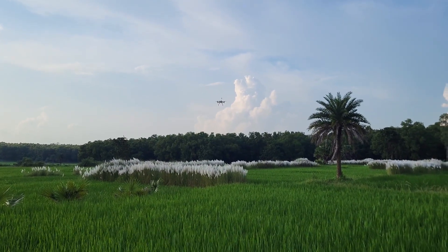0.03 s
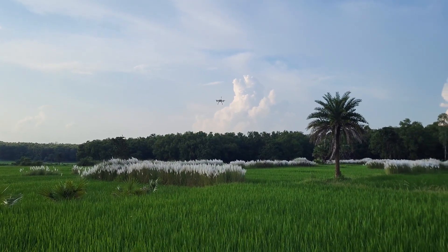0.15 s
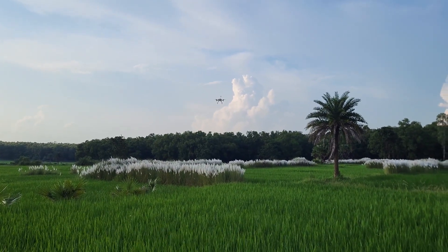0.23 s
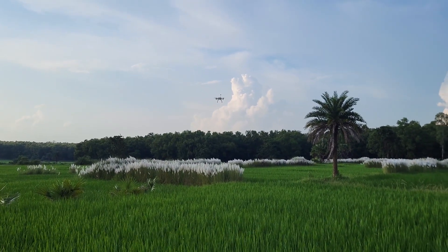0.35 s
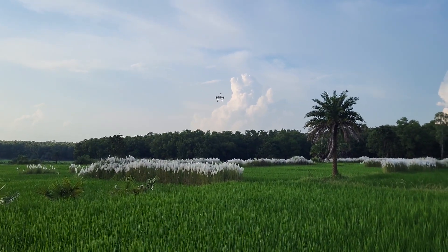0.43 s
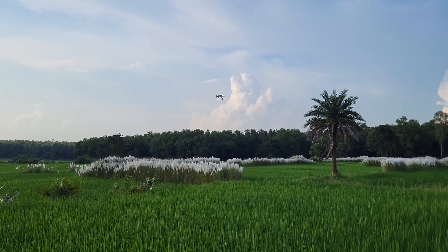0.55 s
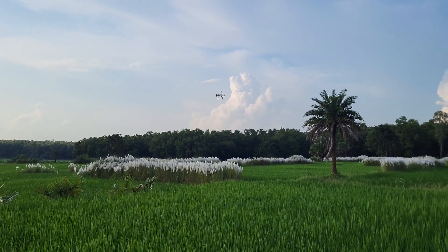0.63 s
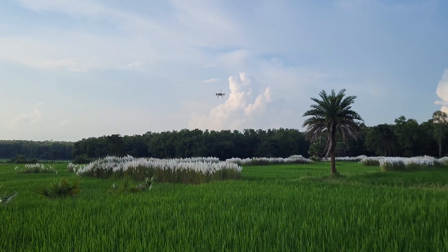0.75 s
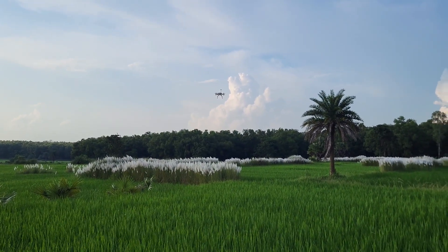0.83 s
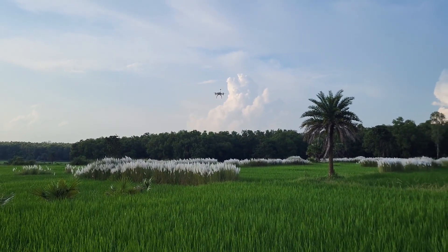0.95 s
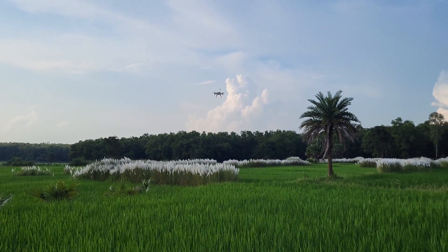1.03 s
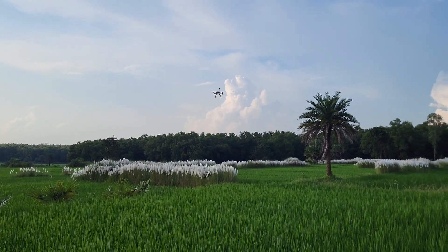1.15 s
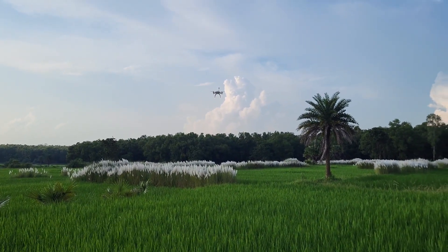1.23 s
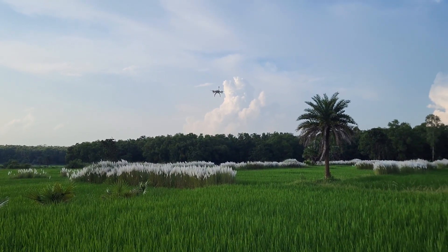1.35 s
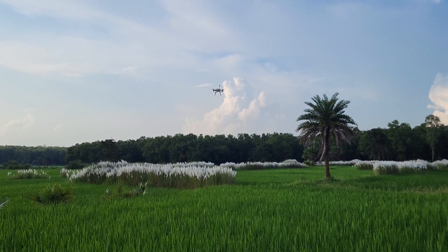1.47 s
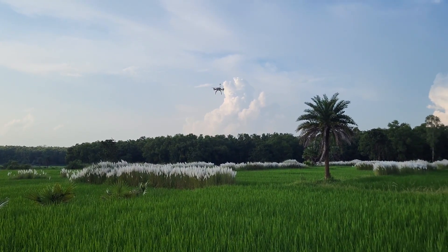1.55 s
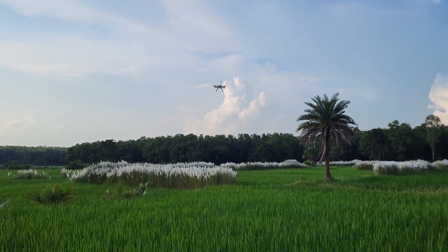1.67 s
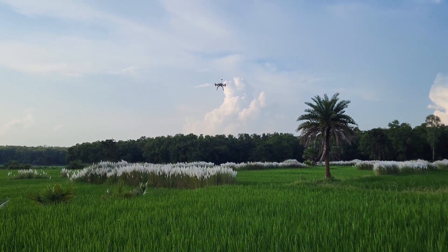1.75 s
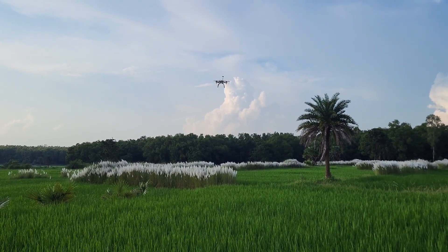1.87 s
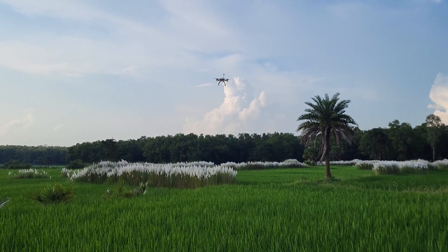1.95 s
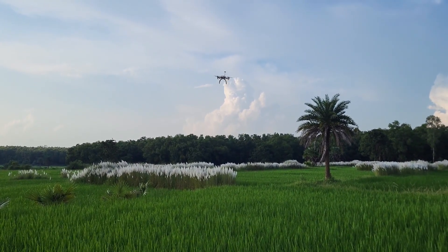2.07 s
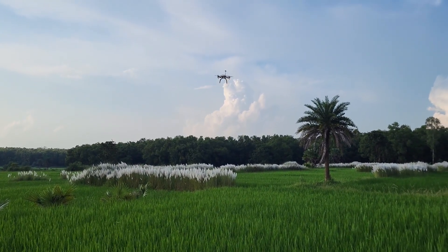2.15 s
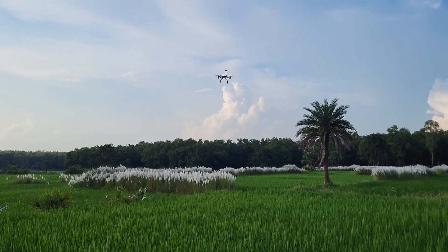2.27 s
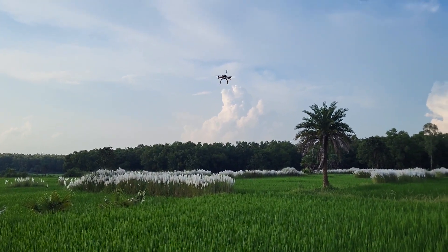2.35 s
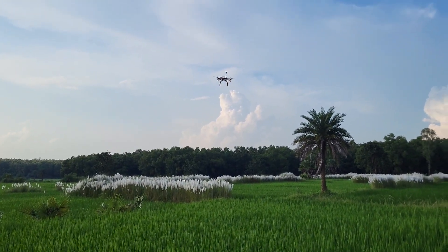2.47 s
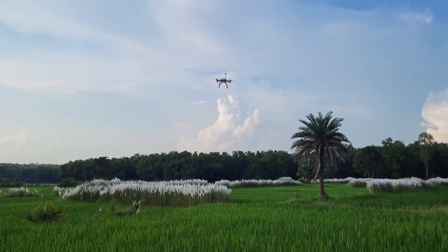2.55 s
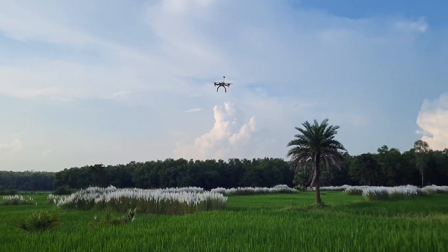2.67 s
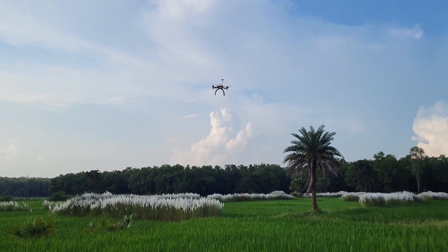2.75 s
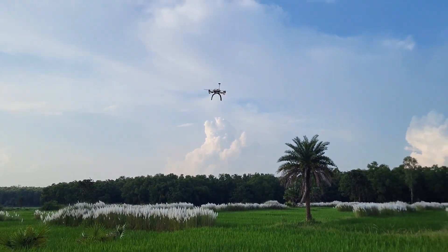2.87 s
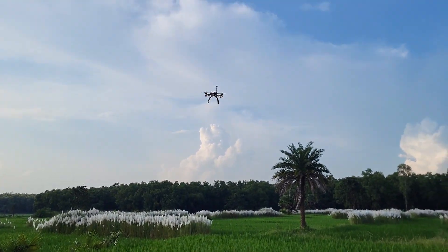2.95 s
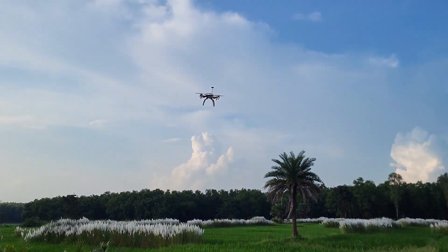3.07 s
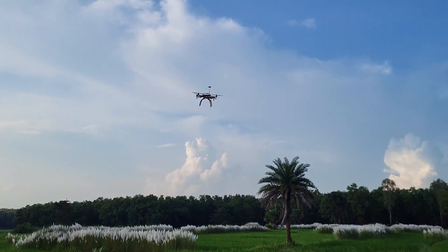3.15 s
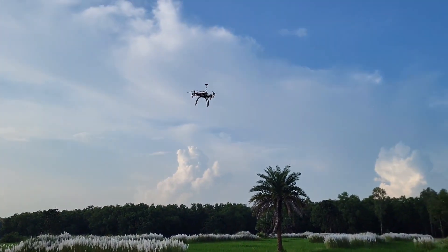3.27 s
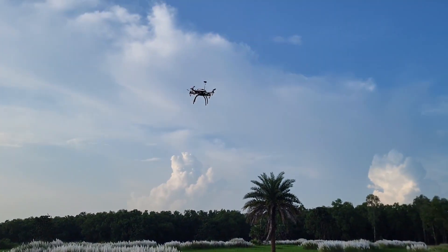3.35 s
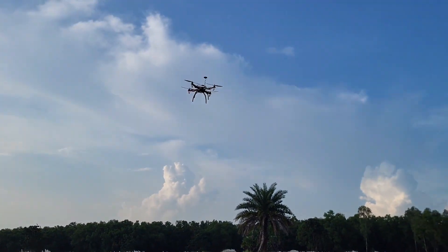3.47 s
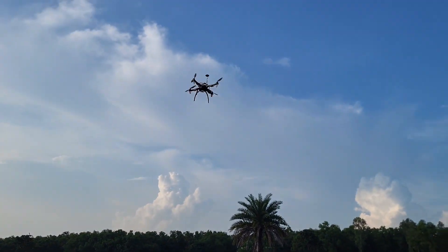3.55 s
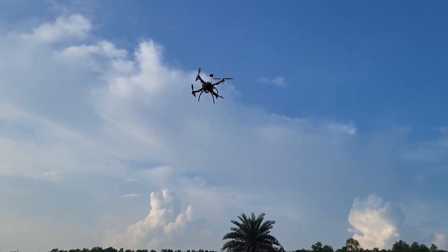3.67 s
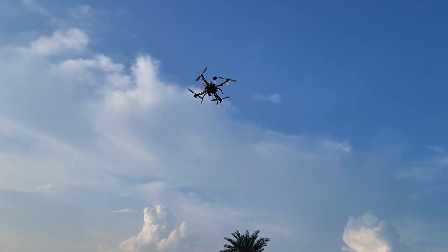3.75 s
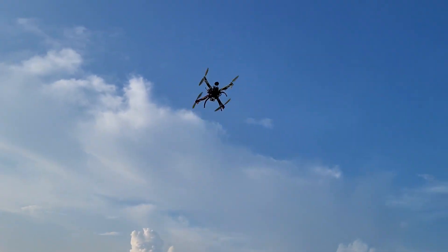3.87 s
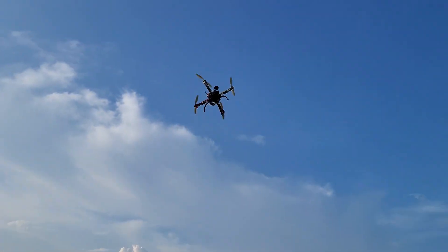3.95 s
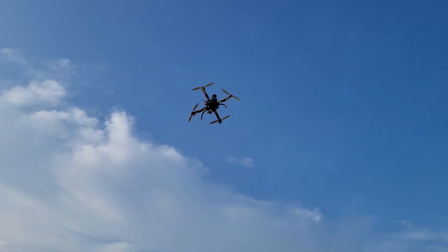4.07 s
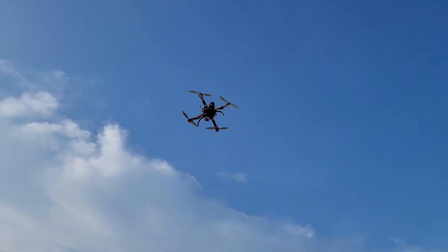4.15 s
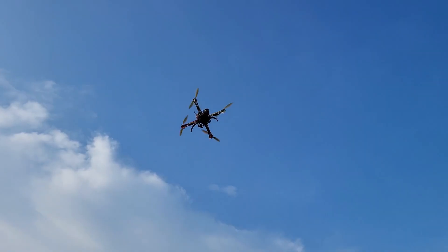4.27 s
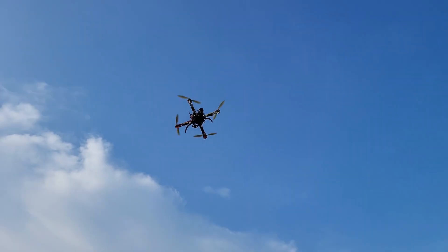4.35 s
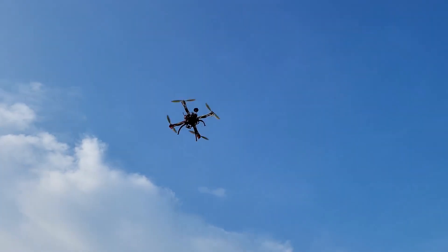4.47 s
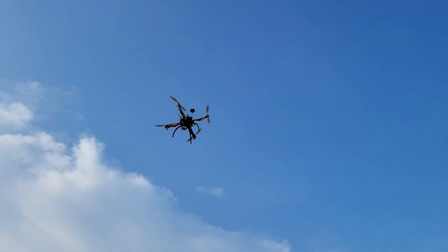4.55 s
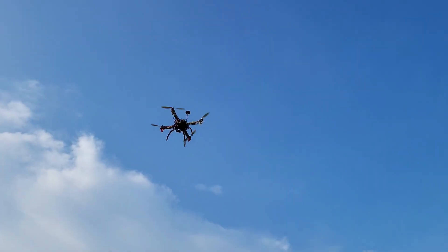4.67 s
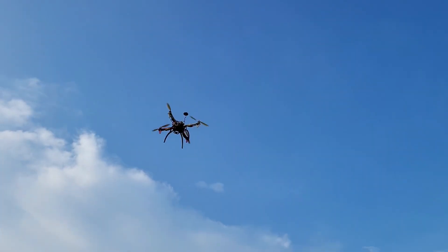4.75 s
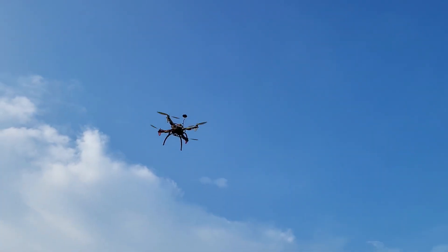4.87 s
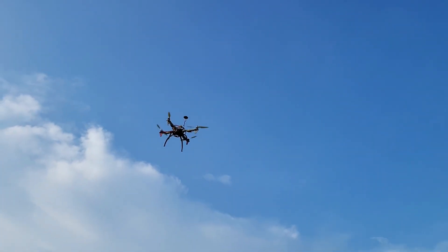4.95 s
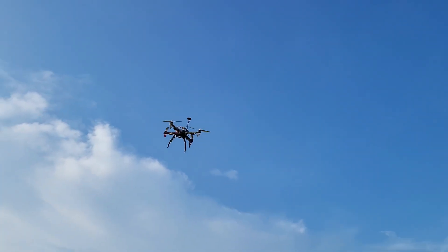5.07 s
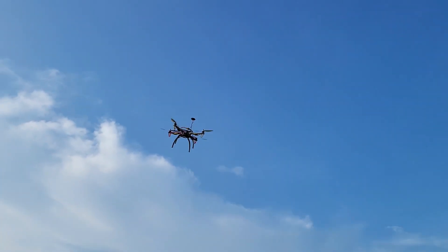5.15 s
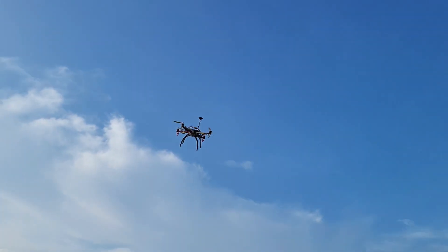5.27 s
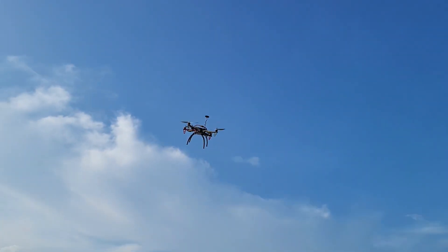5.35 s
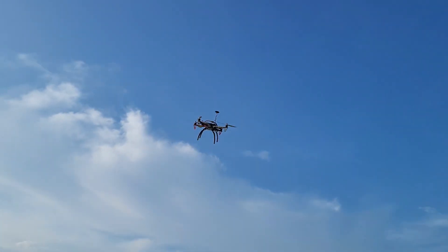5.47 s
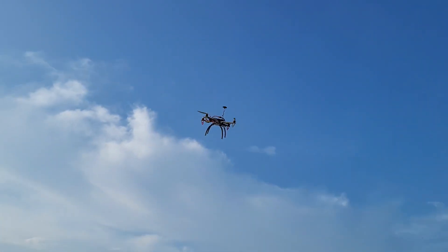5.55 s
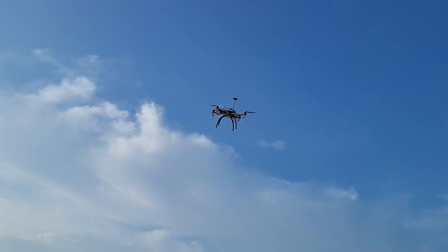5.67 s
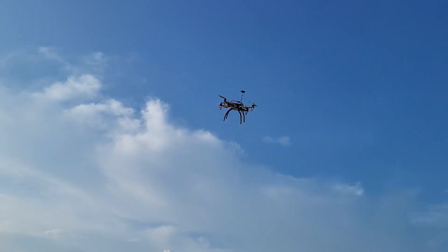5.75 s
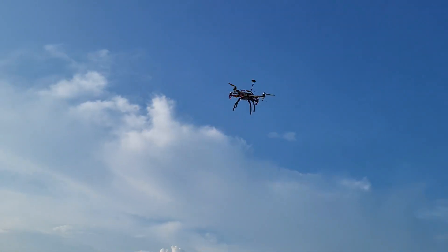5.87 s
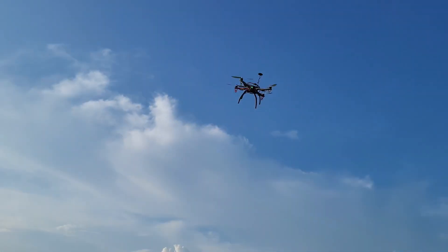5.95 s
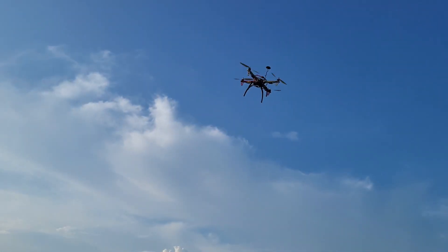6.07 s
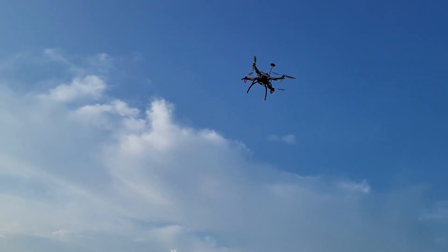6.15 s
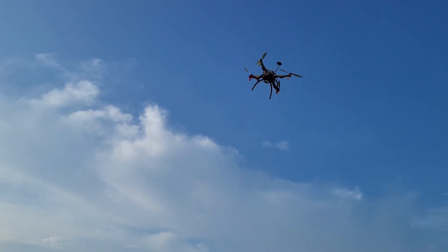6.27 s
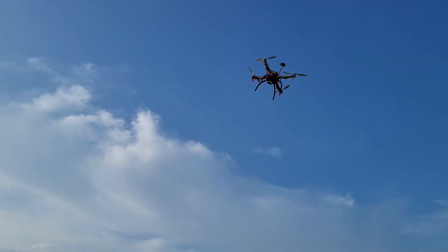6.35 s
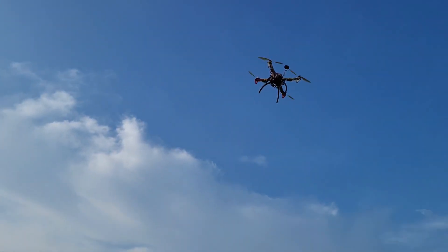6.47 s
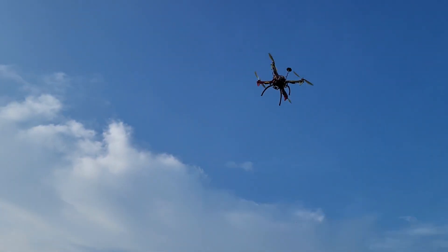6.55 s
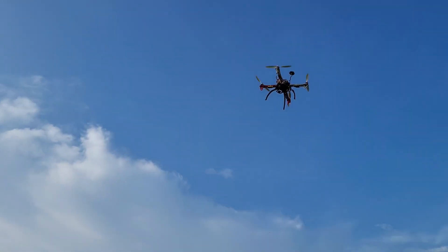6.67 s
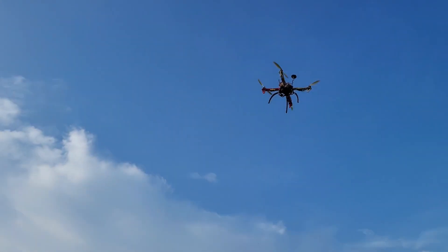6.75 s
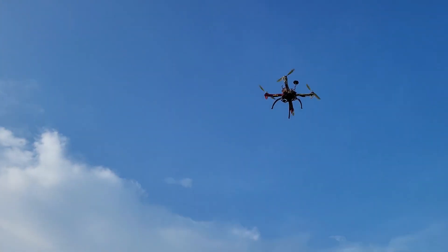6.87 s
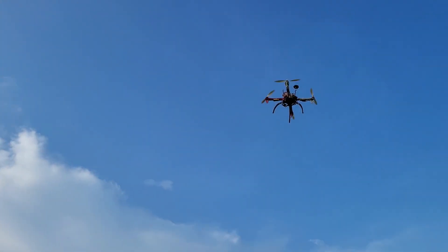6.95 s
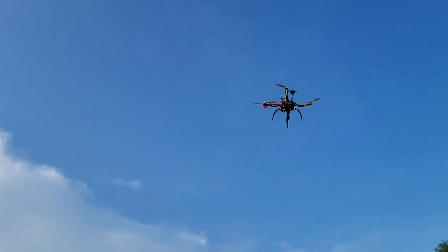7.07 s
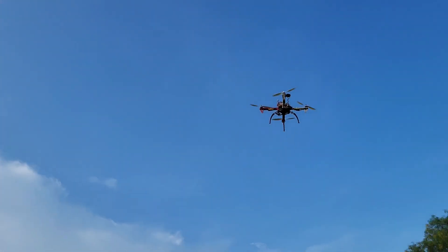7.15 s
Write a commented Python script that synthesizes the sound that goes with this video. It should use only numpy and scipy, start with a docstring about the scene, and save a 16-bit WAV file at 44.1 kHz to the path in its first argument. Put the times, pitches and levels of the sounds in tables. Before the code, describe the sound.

Four slightly mismatched rotors buzz from a distance, their pitches wobbling and beating together, with piercing motor whines above. The drone comes near and its torn-air noise surges as it passes above the listener, then drops back and swells once more. A handheld outdoor stereo microphone picks up low wind thumps and flutter, over a very faint field background.

```python
"""Four propellers of a low quadcopter hum at slightly different speeds and whip up a rushing noise
as it flies in over a rice field, passes overhead near 4 s and hovers close by.
Its motors whine at multiples of shaft speed; their coils sing near 8 kHz with a Doppler bend.
Puffs of wind bump the microphone ports as swings of pressure with flutter; the field is faint noise."""
import sys
import numpy as np
from scipy import signal
from scipy.fft import rfft, irfft, next_fast_len
from scipy.io import wavfile
from scipy.ndimage import uniform_filter1d, map_coordinates

SR = 44100
rng = np.random.default_rng(int(sys.argv[2]) if len(sys.argv) > 2 else 0)


def unload_wav(signal):
    """Save mono or channel-first audio to the path in sys.argv[1] as 16-bit WAV at rate SR, clipped to [-1, 1]."""
    wavfile.write(
        sys.argv[1],
        SR,
        np.round(np.clip(np.atleast_2d(signal).T, -1, 1) * 32767).astype(np.int16),
    )


N = 318402
START_M, CLOSEST_M = 14, 3  # distance at the start, least distance

# Flight towards the microphone. Each row: time in seconds, closing speed in m/s.
CLOSING_SPEED = [(0, 1.6), (2.7, 3.5), (3.5, 3.6), (3.75, 2.5), (4.1, .1), (4.6, -1.6), (5.1, -2.1),
                 (6.1, .15), (6.7, -.7), (7.22, -2)]
# Side of the drone that is heard. Each row: time in seconds, side (0 ahead, 1 below, 2 beside).
HEARD_SIDE = [(0, 0), (3.4, 0), (3.75, 1), (4.5, 1), (5.1, 2), (7.22, 2)]
# Air torn by the blades, loudest from below. Each row: time in seconds, level in dB.
BLADE_WASH = [(0, -57.5), (1.7, -53), (2.6, -50), (3.0, -47), (3.56, -43), (3.66, -34), (3.76, -29.5),
              (3.86, -27), (4.2, -26.5), (4.46, -28.5), (4.7, -36), (4.93, -39), (5.08, -41.5), (5.4, -45),
              (5.95, -43.5), (6.18, -37), (6.55, -32.5), (7.22, -35.5)]
# Relative strength of the rotors. Each row, one a rotor: level in dB ahead, below, beside.
ROTOR_LEVELS = [(-3, 1.5, -3), (2.5, -1.5, 1.5), (-4.5, -8, -0.5), (-6, -4.5, -1.5)]


def amp(db):
    """Decibels to gain."""
    return 10 ** (np.asarray(db) / 20)


def unit(x):
    """Scale to rms 1."""
    return x / np.sqrt(np.mean(x ** 2) + 1e-20)


def along(points, hz):
    """(Hz, value) points joined on a log axis."""
    f, v = np.transpose(points)
    return np.interp(np.log(hz + 1), np.log(f + 1), v)


def curves(rows):
    """One value per sample for each column after the time."""
    s, *cols = np.transpose(rows)
    return np.array([np.interp(np.arange(N) / SR, s, c) for c in cols])


def wobble(rate_hz):
    """A smooth random curve, rate_hz knots a second, computed every 32 samples."""
    knots = rng.standard_normal(int(N * rate_hz / SR) + 4)
    coarse = np.arange(0, N + 32, 32)
    return np.interp(np.arange(N), coarse, map_coordinates(knots, [coarse * rate_hz / SR]))


def angle(hz):
    """Running phase of a changing frequency."""
    return 2 * np.pi * np.cumsum(hz) / SR


def filtered(x, response):
    """x times a response of frequency."""
    m = next_fast_len(N + SR // 4)
    return irfft(rfft(x, m) * response(np.fft.rfftfreq(m, 1 / SR)), m)[..., :N]


def noise(spectrum, alike):
    """Stereo noise of rms 1 with a given colour in dB and left-right correlation."""
    def mid_side(hz):
        turn = np.arccos(np.clip(along(alike, hz), -1, 1)) / 2
        return amp(along(spectrum, hz)) * [np.cos(turn), np.sin(turn)]

    mid, side = filtered(rng.standard_normal((2, N)), mid_side)
    return unit(np.array([mid + side, mid - side]))


def swells(rows):
    """Gain of smooth rises and dips; each row: centre in s, half length in s, dB."""
    t = np.arange(N) / SR
    return amp(sum(db * np.exp(-np.minimum(((t - s) / half_s) ** 2, 20)) for s, half_s, db in rows))


def distance():
    """Metres to the drone, from its closing speed."""
    return np.maximum(START_M - np.cumsum(curves(CLOSING_SPEED)[0]) / SR, CLOSEST_M)


def by_side(levels_db):
    """Gain for the side of the drone that is heard, from its levels ahead, below and beside."""
    power = amp(levels_db) ** 2
    return np.sqrt(np.interp(curves(HEARD_SIDE)[0], np.arange(len(levels_db)), power))


def swell_db():
    """How far the blade wash is below its peak overhead."""
    db = curves(BLADE_WASH)[0]
    return db - db.max()


def shaft_angles(trim=.0026, trim_hz=18, flutter=.0018, flutter_hz=60):
    """Running angle of each motor, which jitters a little around its speed."""
    # Speeds as heard, trimmed by the flight controller; one list a motor.
    # Each row: time in seconds, shaft speed in Hz before jitter.
    shaft_speeds = [
        [(0, 76.6), (.55, 76), (.68, 76.8), (.82, 80.2), (.97, 79.2), (1.07, 79.7), (1.18, 78.7), (1.27, 78.06),
         (1.42, 80.1), (1.54, 81.2), (1.68, 78.8), (1.8, 79.3), (1.97, 80.5), (2.1, 78.9), (2.22, 79.93),
         (2.53, 78.96), (2.77, 80.8), (2.9, 79.65), (3, 81.86), (3.07, 82.17), (3.16, 84.14), (3.3, 84.4),
         (3.42, 79.6), (3.52, 79.34), (3.7, 84.95), (3.85, 82.48), (4, 77.58), (4.12, 74.94), (4.25, 76.3),
         (4.45, 71.66), (4.7, 76.78), (4.95, 75.32), (5.2, 76.53), (5.38, 78.7), (5.53, 80.9), (5.64, 79.26),
         (5.73, 80.3), (5.8, 80.2), (5.88, 81.6), (6.04, 77.73), (6.27, 80.08), (6.45, 78.72), (6.7, 76.84),
         (7.22, 75.52)],
        [(0, 77.7), (.3, 78.5), (.5, 77), (.65, 76.8), (.8, 79.05), (1, 77.1), (1.27, 78.55), (1.45, 77.4),
         (1.62, 78.65), (1.85, 77.53), (2.37, 78.3), (2.5, 77.6), (2.7, 79.8), (2.93, 80.96), (3.05, 79.7),
         (3.17, 80.09), (3.45, 77.53), (3.78, 80.86), (4.1, 74.96), (4.45, 71.98), (4.8, 73.7), (5.12, 74.3),
         (5.25, 76.52), (5.45, 78.73), (5.78, 79.32), (5.95, 76.1), (6.12, 78.65), (6.6, 77.42), (7.22, 76.3)],
        [(0, 74.5), (.3, 73.1), (.7, 71.4), (.95, 72.4), (1.07, 73.4), (1.2, 72.4), (1.45, 72), (1.7, 72.63),
         (2.55, 72.73), (2.75, 74.5), (2.87, 73.2), (3.08, 75.2), (3.3, 71.97), (3.52, 71.98), (3.8, 60.58),
         (4.05, 66.35), (4.5, 71.9), (5.1, 74.14), (5.22, 75.3), (5.42, 76.6), (5.78, 75.43), (5.9, 76.73),
         (6.05, 75.14), (6.22, 74.03), (6.35, 72.96), (6.6, 74.54), (7.22, 73.96)],
        [(0, 84.8), (.42, 83.1), (.57, 84.6), (.8, 83.7), (1.35, 84.26), (1.5, 84.3), (1.63, 83.25),
         (1.8, 84.4), (1.97, 83.5), (2.12, 85.46), (2.35, 83.4), (2.5, 85.5), (2.7, 82.4), (2.87, 83.1),
         (3.05, 81.98), (3.3, 83.72), (3.62, 87.5), (3.9, 87.06), (4.1, 82.08), (4.35, 84.08), (4.6, 82.05),
         (4.85, 76.6), (5.1, 75.94), (5.3, 77.8), (5.48, 80.9), (5.6, 79.9), (5.75, 80.87), (5.95, 79.08),
         (6.12, 77.27), (6.35, 77.9), (7.22, 75.1)],
    ]
    shafts = []
    for speed in shaft_speeds:
        jitter = 1 + trim * wobble(trim_hz) + flutter * wobble(flutter_hz)
        shafts.append(angle(curves(speed)[0] * jitter))
    return shafts


def propellers(shafts, waver_db=3.3, rough_rad=0.16, grazing_m=10.07, grazing_power=3.5):
    """Two-blade rotors beat together; ground reflection cancels bass of the far, low drone."""
    # Blade-pass harmonics at full strength. Each row: level in dB ahead, below, beside,
    # dB cancelled by the ground at grazing_m.
    harmonics = [(-25, -33.5, -29, 16.5), (-31, -31, -40, 0.5), (-29, -29, -27, 3.5),
                 (-36.5, -34, -39, 3.5), (-42, -38, -56, 1), (-45, -47, -51.5, 3), (-36, -43, -39, 4.5),
                 (-46, -43, -60, 4)]
    # Hum swells and dips. Each row: centre in seconds, half length in seconds,
    # change in dB of the first, second and third harmonic.
    hum_swells = [(.15, .2, -6, -2, 1.5), (0.66, 0.11, -8, -17, -8), (0.877, .05, 0, 5, -2),
                  (1.04, 0.031, -3, 8, -13), (1.24, .07, -3, 4, -2), (1.52, .06, 5, 2, 3),
                  (2.101, 0.086, 7, 1, 5.5), (2.4, 0.058, 3, -8, 3), (2.76, 0.16, -0.5, -15, -10),
                  (3.04, 0.038, 3, 4, 5), (3.25, 0.12, 2, 4.5, 1.5), (3.58, 0.072, -8, -6, -6),
                  (3.789, 0.052, 7, 5.5, 1.5), (3.93, 0.031, -4, -7, -1.5), (4.005, 0.038, 8, 7, 4),
                  (4.109, 0.034, 6, 11, 8.5), (4.27, 0.1, 3, -3.5, -0.5), (4.48, 0.082, -5, 2, 1.5),
                  (4.75, .17, 0, -4, -1.5), (5.19, 0.049, 5, 0, 7), (5.38, .03, -2, -2, -10),
                  (5.521, 0.11, 0.5, 6, 4), (5.869, 0.079, 7, 7, 6.5), (6.27, 0.084, 4, 7, 6),
                  (6.72, .12, -3, -2, -3.5), (7.08, 0.14, -5, -4, 0)]

    lifts = [swells([(s, half_s, dbs[k]) for s, half_s, *dbs in hum_swells]) for k in range(3)]
    lifts.append(np.sqrt(lifts[2]))  # higher harmonics follow the third half as far in dB
    swell = swell_db()
    grazing = (distance() / grazing_m) ** grazing_power  # ground's share grows steeply with distance
    levels = []
    for k, (*sides, ground_db) in enumerate(harmonics):
        levels.append(by_side(sides) * amp(swell - ground_db * grazing) * lifts[min(k, 3)])

    shares = np.array([by_side(sides) for sides in ROTOR_LEVELS])
    shares /= np.linalg.norm(shares, axis=0)
    out = np.zeros(N)
    for shaft, share in zip(shafts, shares):
        blade = 2 * shaft + rough_rad * wobble(60)
        for k, level in enumerate(levels, 1):
            tone = np.sin(k * blade + rng.uniform(0, 2 * np.pi))
            out += share * level * unit(amp(waver_db * wobble(20)) * tone)
    return out


def turbulence(shafts, order=128, odd_db=-7):
    """Each blade sheds nearly the same eddies turn after turn; the pattern slowly changes."""
    k = np.arange(order)
    weights = amp(odd_db * (k % 2)) * (k > 6) / np.sqrt(1 + (k / 40) ** 4)
    grid = np.linspace(0, 2 * np.pi, 2048, endpoint=False)
    out = np.zeros(N)
    for shaft, (ahead_db, *_) in zip(shafts, ROTOR_LEVELS):
        patterns = irfft(weights * np.exp(2j * np.pi * rng.random((3, order))), len(grid))
        blend = np.array([wobble(14) for _ in patterns])
        blend /= np.linalg.norm(blend, axis=0) + 1e-6  # the shape changes, the power stays
        turn = shaft % (2 * np.pi)
        out += amp(ahead_db / 2) * sum(b * np.interp(turn, grid, p) for b, p in zip(blend, patterns))
    # equal in spectral density to unit white noise at the low harmonics
    return unit(out) * np.sqrt(2 * 3200 / SR)


def patchy(x, depth_db=1.35):
    """Eddies make patches of the noise, in time and frequency, louder and softer."""
    z = signal.stft(x, nperseg=512)[2]
    patches = rng.standard_normal(z.shape[1:])
    patches = uniform_filter1d(patches, size=5, axis=0)
    patches = uniform_filter1d(patches, size=14, axis=1)
    return signal.istft(z * amp(depth_db * unit(patches)), nperseg=512)[1][:, :N]


def rush(shafts, pulsing=0.12, swirl_db=1.1, hiss_growth=0.79):
    """Turbulence off the blades, part buzz and part noise, coloured by the side that is heard."""
    # Colour of the air from three sides. Each row: frequency in Hz, relative density in dB per Hz.
    ahead = [(150, -7), (350, 4.5), (600, 7), (820, -0.5), (1100, 7.5), (1350, 4.5), (1900, 9.5),
             (2350, 3.5), (2750, -1.5), (3300, 1), (3700, -1.5), (4100, 5), (4700, 3), (5200, -4.5),
             (7900, -0.5), (9500, -7.5), (11000, -6), (12000, -10.5), (17000, -6.5)]
    below = [(100, -26), (200, -2.5), (400, -1.5), (700, -6.5), (1150, -2), (1500, -7.5), (2080, -2.5),
             (2350, -6.5), (2800, -6.5), (4700, -3), (5400, -7.5), (8000, -10), (9000, -15.5), (10800, -19),
             (12200, -16.5), (17000, -16.5)]
    beside = [(150, -11), (450, 5.5), (680, -4), (850, -5), (1100, -0.5), (1650, -1.5), (2030, 2),
              (2350, -2.5), (2750, 3.5), (3800, 1.5), (4250, 4), (4900, -0.5), (8200, 1), (9000, -4),
              (9800, -9), (12000, -5.5), (17000, -7)]
    # Far and near drone. Each row: frequency in Hz, left-right correlation.
    far_alike = [(300, 0.63), (1400, 0.92), (3100, 0.71), (6800, 0.33), (10000, 0.19), (15000, .02)]
    near_alike = [(300, 0.87), (1400, 0.81), (3100, 0.55), (6800, 0.19), (10000, 0.28), (15000, .05)]
    # Hiss at full strength: level in dB ahead, below, beside.
    hiss_db = (-23.5, -26.5, -24)
    # Blade buzz over the plain noise: level in dB ahead, below, beside.
    buzz_over_noise_db = (-5, 1, -3)
    # Top treble. Each row: time in seconds, level in dB.
    fizz = [(0, -52.5), (1.6, -50.5), (3, -45), (3.55, -43), (3.85, -37), (4.15, -37), (4.5, -35),
            (4.9, -39.5), (5.3, -44), (5.95, -43), (6.2, -37.5), (7.22, -39)]

    wash_level = amp(curves(BLADE_WASH)[0])
    hiss_level = by_side(hiss_db) * amp(hiss_growth * swell_db())  # hiss_growth: dB per dB of wash
    levels = [wash_level, hiss_level, amp(curves(fizz)[0])]

    def bands(hz):
        return np.array([hz < 2200, (hz >= 2200) & (hz < 9300), hz >= 9300])[:, None]

    view = curves(HEARD_SIDE)[0]
    buzz = turbulence(shafts)
    sides = zip((ahead, below, beside), (far_alike, near_alike, near_alike), buzz_over_noise_db)
    out = np.zeros((2, N))
    for k, (colour, alike, buzz_db) in enumerate(sides):
        white = noise([(100, 0)], alike)
        air = patchy(white + amp(buzz_db) * buzz)
        parts = filtered(air, lambda hz: amp(along(colour, hz)) * bands(hz))
        share = np.cos(np.pi / 2 * np.clip(abs(view - k), 0, 1))
        out += share * sum(level * unit(part) for level, part in zip(levels, parts))
    beat = 1 + pulsing * sum(np.cos(2 * shaft) for shaft in shafts) / 2  # a swish at each blade pass
    return out * unit(beat * amp(swirl_db * wobble(70)))


def motors(shafts, rough_rad=0.2, ripple=.22, flicker_db=2.2, flicker_hz=28,
           frame_hz=3424, frame_width_hz=138, frame_db=6.5):
    """Fourteen magnets sweep past stator teeth; a frame resonance lifts the middle whine."""
    # Whines at the closest distance, one list each for shaft orders 28, 30, 42, 56.
    # Each row, one a motor: level in dB ahead, below, beside.
    whines = [
        [(-63, -66, -69), (-62, -66, -70), (-77, -70, -66), (-56, -59, -70)],
        [(-49, -69, -50), (-53, -66, -79), (-69, -64, -66), (-51, -66, -66)],
        [(-42.5, -46, -44.5), (-48.5, -62, -45), (-70, -64, -53), (-62, -72, -63)],
        [(-56, -54, -45), (-45, -53, -47), (-41.5, -48, -41), (-42.5, -50, -43)],
    ]
    # Middle whine (order 42). Each row: centre in seconds, half length in seconds, change in dB.
    middle_swells = [(.1, 0.45, -15), (.66, .07, 4), (.86, 0.11, -6), (1.08, 0.055, 4), (1.21, .08, 6),
                     (1.38, 0.044, -14), (1.5, 0.058, -1), (1.7, 0.11, -12), (1.95, 0.061, 3),
                     (2.05, 0.026, -1), (2.2, .1, 2.5), (2.5, .04, -2), (2.94, 0.026, 6), (3.03, 0.039, 5),
                     (3.22, 0.13, 3.5), (3.45, 0.075, -4), (5.0, 0.18, -16), (5.35, 0.046, 0),
                     (5.49, 0.048, 1), (5.6, 0.041, -5), (5.76, 0.084, 4), (5.98, 0.041, -4),
                     (6.09, .05, 10.5), (6.28, 0.072, 7.5)]
    # Low and high whines. Each row: centre in seconds, half length in seconds, change in dB.
    outer_swells = [(.05, 0.18, -10), (.75, .06, -12), (.91, .05, 2), (1.75, 0.081, -9), (2.8, 0.26, -0.5),
                    (4.8, 0.24, -6), (5.2, 0.049, 3.5), (5.4, 0.099, -2), (5.75, 0.063, 5),
                    (5.9, 0.068, -2), (6.12, 0.084, 4), (6.8, .3, -7)]

    middle, outer = swells(middle_swells), swells(outer_swells)
    out = np.zeros((2, N))
    for m, shaft in enumerate(shafts):
        middle_hz = 42 * np.gradient(shaft) * SR / (2 * np.pi)
        frame = amp(frame_db) / np.hypot(1, (middle_hz - frame_hz) / frame_width_hz)
        lifts = (outer, outer, frame * middle, outer)
        for order, levels, lift in zip((28, 30, 42, 56), whines, lifts):
            phase = order * shaft + rough_rad * wobble(150)
            throb = 1 + ripple * np.cos(shaft + rng.uniform(0, 2 * np.pi))  # once a turn
            spread = .15 * wobble(3)  # the frame scatters the whine differently to each port
            tone = np.sin([phase + spread, phase - spread])
            flicker = amp(flicker_db * wobble(flicker_hz))
            out += by_side(levels[m]) * lift * throb * flicker * tone
    return out * CLOSEST_M / distance()


def coils(shafts, shaft_db=-21, blade_db=-16, commutation_db=-21,
          waver_db=2.0, drift_db=1.25, undertone_db=-15):
    """Doppler-shifted switching tones with sidebands from shaft, blades and commutation."""
    # Speed controllers. Each row, one a motor: switching frequency in Hz, left-right balance in dB.
    switching = [(7915, -3.7), (7890, -3.5), (7991, -2.5), (7748, -2.8)]
    # Coil song at the closest distance. Each row, one a motor: level in dB ahead, below, beside.
    coil_levels = [(-32.5, -52, -35.5), (-47, -40, -48), (-38.5, -42, -38.5), (-47, -42, -39)]
    # Swells and dips of the coil song.
    # Each row: centre in seconds, half length in seconds, change in dB.
    coil_swells = [(1.7, 0.053, -4), (2.45, 0.73, 0), (3.14, 0.051, -5), (3.5, 0.13, -5), (3.78, 0.094, 5),
                   (4.35, 0.099, -8), (4.8, 0.086, 2), (5.02, 0.051, -12), (5.24, 0.073, -4.5),
                   (5.44, 0.047, 0.5), (5.63, 0.039, -8.5), (6.12, 0.085, 4), (6.55, .12, 9), (7.1, .2, -3)]

    doppler = 1 / (1 - curves(CLOSING_SPEED)[0] / 343)
    ripples = list(zip((1, 2, 14), (shaft_db, blade_db, commutation_db)))  # shaft order, dB
    out = np.zeros((2, N))
    for shaft, (hz, pan_db), sides in zip(shafts, switching, coil_levels):
        chop = np.ones(N)
        for k, depth_db in ripples:
            chop += 2 * amp(depth_db) * np.cos(k * shaft + rng.uniform(0, 2 * np.pi))
        phase = angle(hz * doppler) + .22 * wobble(300)
        spread = .3 * wobble(2)
        waver = amp(waver_db * wobble(25) + drift_db * wobble(3.94))
        tone = chop * waver * np.sin([phase + spread, phase - spread])
        tone += amp(undertone_db) * np.sin(phase - 14 * shaft)  # extra lower commutation sideband
        out += by_side(sides) * unit(tone * amp([[pan_db / 2], [-pan_db / 2]]))
    return out * swells(coil_swells) * CLOSEST_M / distance()


def at_ports(x):
    """The sound reaches the nearer port first."""
    # Direction of the drone. Each row: time in seconds, lead of the left port in microseconds.
    bearing = [(0, 8), (2, 10), (2.8, 22), (3.3, 50), (3.8, 38), (4.6, 42), (5.1, 18), (5.7, -15),
               (6.3, -30), (7.22, -38)]
    lead = curves(bearing)[0] * SR / 1e6  # in samples
    return np.array([map_coordinates(c, [np.arange(N) + side * lead / 2]) for c, side in zip(x, (1, -1))])


def wind(lumpy_db=5.0, swing_s=0.012, flutter_lift_db=1, flutter_s=0.023):
    """Uneven buffeting, nearly unrelated at the ports; each eddy is a pressure swing and a flutter."""
    # Breeze on the ports. Each row: time in seconds, level in dB.
    breeze = [(0, -51), (.15, -55.5), (.38, -73), (.55, -64), (.77, -66), (.85, -46), (.93, -50),
              (1.05, -53), (1.3, -64), (1.7, -74), (1.8, -51.5), (2.3, -56), (2.5, -43), (3.4, -36),
              (3.65, -34), (4.05, -31.5), (4.8, -41), (5.05, -33), (5.35, -39.5), (5.55, -38), (5.75, -32),
              (6.1, -30.5), (6.8, -34), (7.22, -24.5)]
    # Colour of the buffeting. Each row: frequency in Hz, relative density in dB per Hz.
    buffet = [(12, -34), (22, -14), (50, 2), (85, -2), (130, -5), (200, -17.5), (350, -18), (700, -36),
              (1500, -90)]
    # Colour of the flutter. Each row: frequency in Hz, relative density in dB per Hz.
    flutter_colour = [(30, -20), (80, -4), (140, 4), (230, -2), (330, -7), (500, -28), (1500, -42)]
    # Single puffs. Each row: time in seconds, pressure swing in dB, its frequency in Hz,
    # flutter in dB before flutter_lift_db, left-right balance in dB.
    puffs = [(0.844, -31.5, 78, -66, 0.0), (2.497, -23, 72, -49.0, 3), (2.583, -24.0, 72, -42, 1),
             (2.727, -39, 70.96, -49, -5.0), (2.86, -27, 75.1, -42, 0), (2.945, -25, 62, -41, -1.0),
             (3.023, -27, 74.5, -43.5, 16), (3.3, -28, 90.2, -48.0, -4), (3.433, -27.5, 74.35, -45, -9.0),
             (3.496, -34, 74, -40, -1), (4.012, -22, 98.12, -34, 1.0), (5.092, -26.0, 78.94, -44, 2.0),
             (5.251, -13.5, 78.03, -27, -3), (5.346, -33, 85, -49, -20), (5.43, -19, 81, -35, 7.0),
             (5.571, -24, 69, -53, -12), (5.672, -9, 67.7, -35, -2), (5.83, -25.0, 69, -38, 8),
             (5.901, -18.5, 89.2, -33.5, 0.0), (5.996, -31, 97.8, -33.5, 11),
             (6.072, -21.0, 87.1, -37, 15.0), (6.204, -13.5, 80.1, -31, 1), (6.247, -18, 94.94, -35, 2.0),
             (6.436, -21, 85, -25.5, -3), (6.471, -22.5, 90.16, -39.0, 13), (6.549, -21.5, 71.1, -25, 15),
             (6.652, -18.5, 87.86, -28, 3), (6.962, -13.5, 67.23, -20.5, -3.5),
             (7.018, -19, 76.17, -30, -6.0), (7.103, -15, 88.16, -28.5, -3), (7.163, -24, 86.6, -43, 7),
             (7.212, -9.5, 85.1, -28.0, 2)]

    lumps = amp(lumpy_db * np.array([wobble(25), wobble(25)]))
    out = amp(curves(breeze)[0]) * unit(lumps * noise(buffet, [(30, 0.055)]))
    flutter = noise(flutter_colour, [(30, 0.14)])
    uneven = .8 * np.array([wobble(110), wobble(110)])  # radians
    t = np.arange(N) / SR
    start_phases = rng.uniform(0, 2 * np.pi, (len(puffs), 2, 1))
    for (s, swing_db, hz, flutter_db, pan_db), phases in zip(puffs, start_phases):
        near = abs(t - s) < .12
        u = t[near] - s
        swing = np.sin(2 * np.pi * hz * u + phases + uneven[:, near])
        swing *= amp(swing_db) * np.exp(-abs(u / swing_s) ** 1.35)
        burst = amp(flutter_db + flutter_lift_db) * np.exp(-abs(u / flutter_s) ** 1.7) * flutter[:, near]
        out[:, near] += amp([[pan_db / 2], [-pan_db / 2]]) * (swing + burst)
    return out


def field(floor_db=-68):
    """Faint open-air background: steady noise, strongest in the bass and near 1 kHz."""
    colour = [(30, -10), (100, -23), (200, -17), (1000, -10), (8000, -33)]
    return amp(floor_db) * noise(colour, [(100, 0.47), (3000, .2)])


def scene():
    """The drone, the wind and the field."""
    shafts = shaft_angles()
    drone = propellers(shafts) + rush(shafts) + motors(shafts) + coils(shafts)
    return at_ports(drone) + wind() + field()


def record(dry, top_hz=15850):
    """The recorder keeps nothing above its band limit."""
    return filtered(dry, lambda hz: hz < top_hz)


dry = scene()
out = record(dry)
unload_wav(out)
```